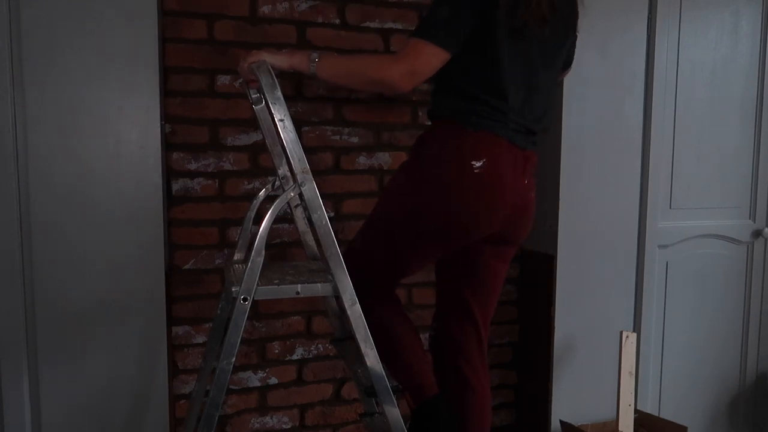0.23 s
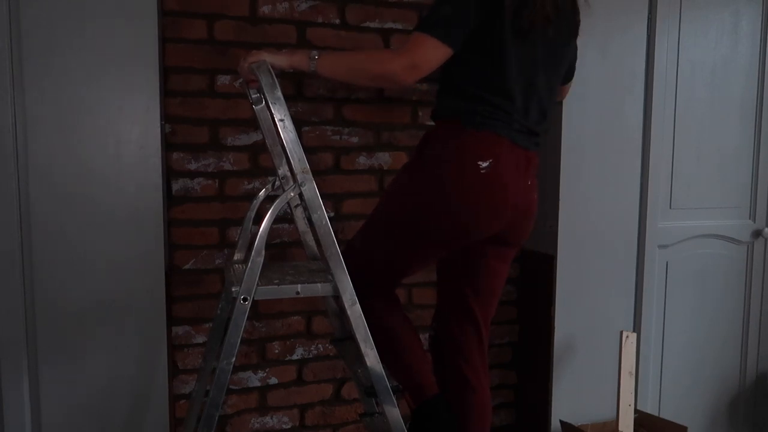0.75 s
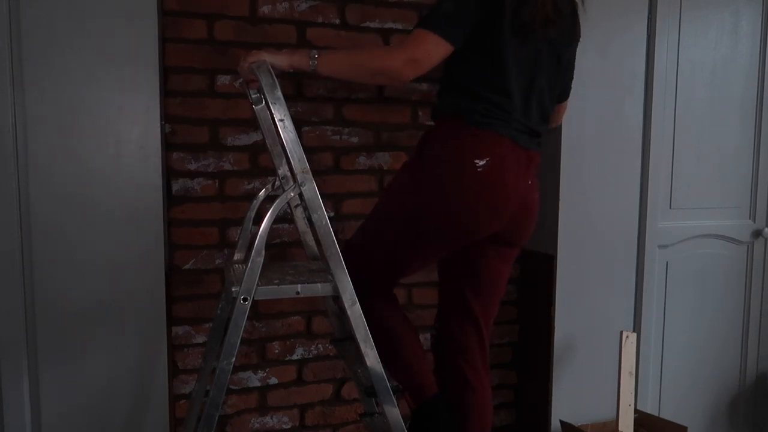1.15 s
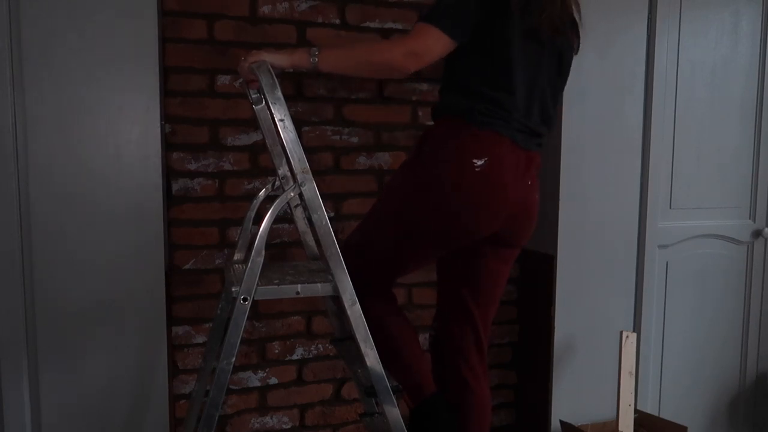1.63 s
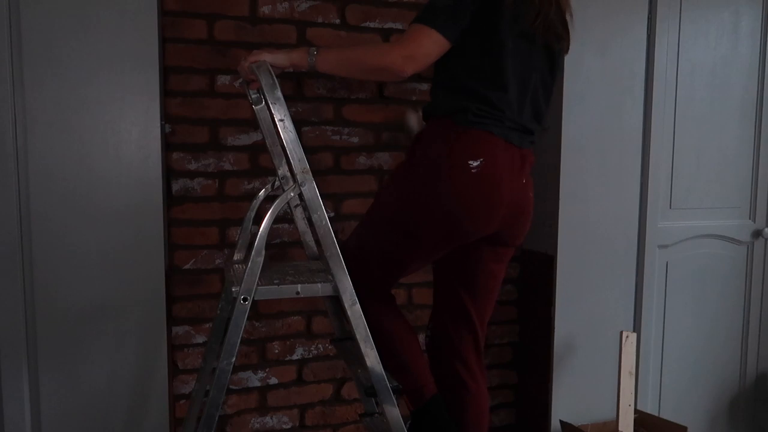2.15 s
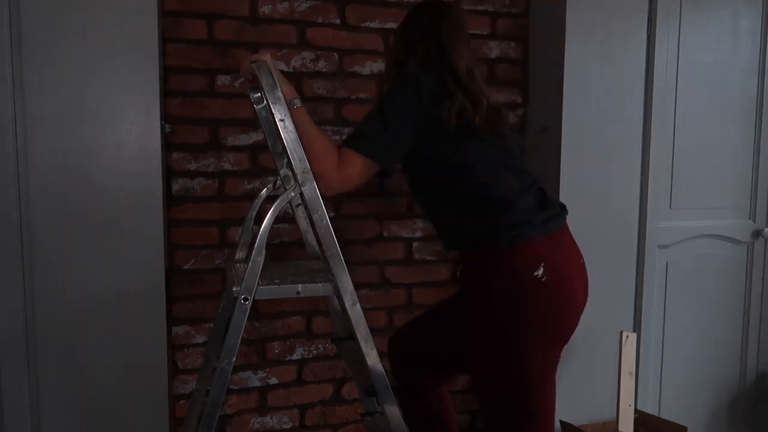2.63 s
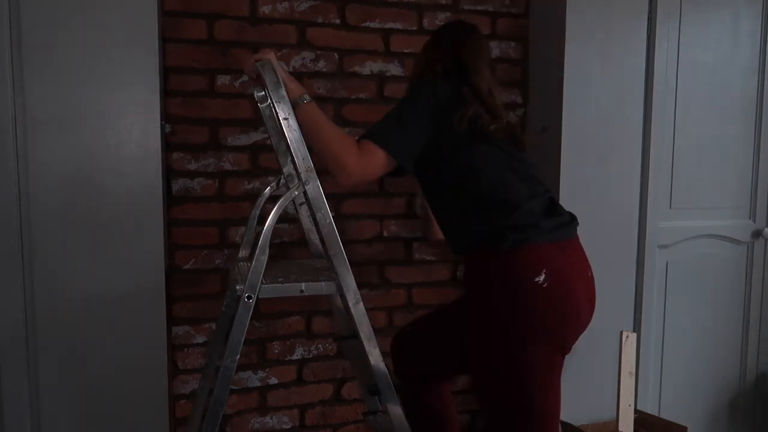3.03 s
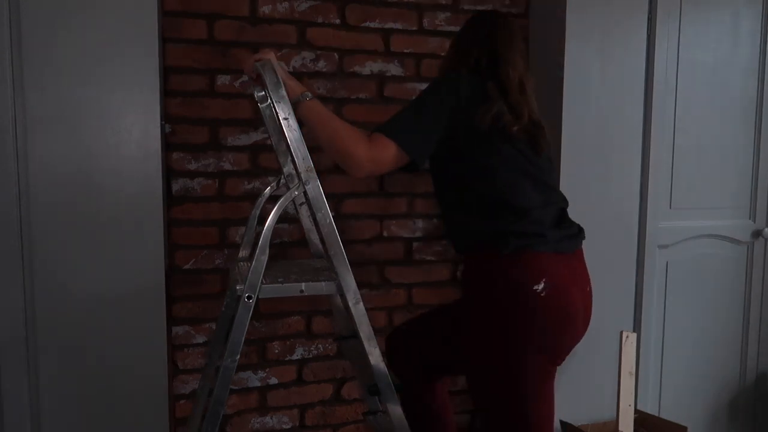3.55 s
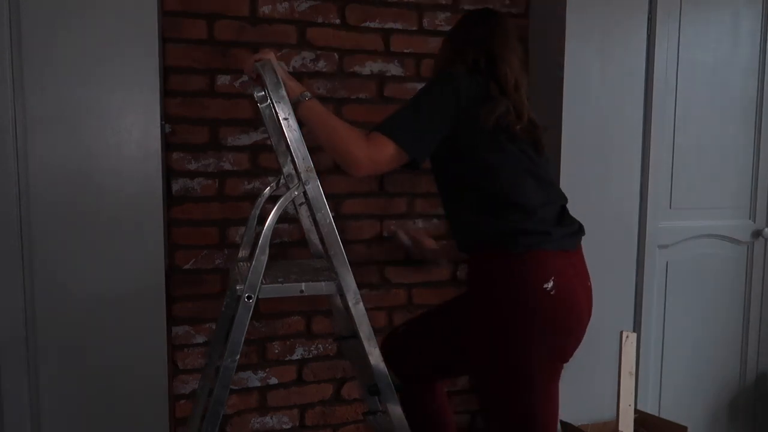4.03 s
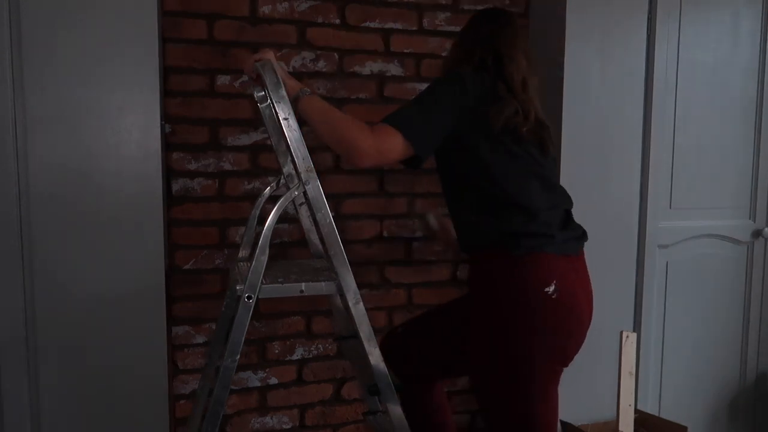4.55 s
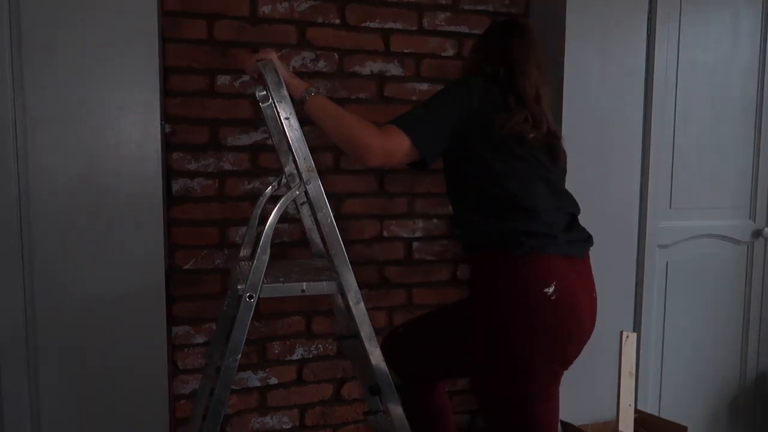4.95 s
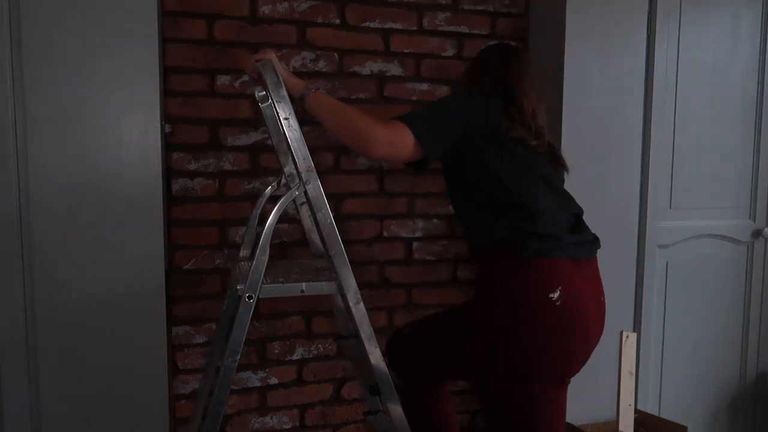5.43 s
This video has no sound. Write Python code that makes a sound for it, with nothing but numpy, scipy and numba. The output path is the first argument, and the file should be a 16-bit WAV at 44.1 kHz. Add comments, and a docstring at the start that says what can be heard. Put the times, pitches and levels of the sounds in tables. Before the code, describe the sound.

Dry bristles rasp over rough brick about twice a second, then falter, with ladder knocks and one hard final stroke.

```python
"""Mains hum, low rumble and room air lie under the whole take in a bare room, a few metres from the camera.
From the first moment a stiff brush sweeps a brick wall: bristle tips skip over rough clay as dense ticks that
ring the brush, and its block taps the wall as it lands. Near 2.9 s weight shifts knock the stepladder in a
cluster; a far engine, two noise bands that rise in pitch, revs at 3.1 s and 4.3 s. The last stroke, at 5.6 s,
lands hardest, with bright taps and the strongest ladder knock."""
import sys
import numpy as np
from scipy import signal
from scipy.fft import rfft, irfft, next_fast_len
from scipy.io import wavfile
from scipy.ndimage import uniform_filter1d
from numba import njit

SR = 44100
rng = np.random.default_rng(int(sys.argv[2]) if len(sys.argv) > 2 else 0)


def log_audio(samples):
    """Write samples as a 16-bit WAV file to the path given in sys.argv[1]."""
    # one column per channel
    frames = np.atleast_2d(samples).T
    # limit to full scale, then quantise
    limited = np.clip(frames, -1, 1)
    pcm = np.round(limited * 32767).astype(np.int16)
    wavfile.write(sys.argv[1], SR, pcm)


N = 250929


def undb(db):
    """Gain of a level in dB."""
    return 10 ** (np.asarray(db) / 20)


def level(x, db):
    """Scale to an rms level."""
    return x * undb(db) / np.sqrt(np.mean(x ** 2))


def curves(table):
    """Columns of a table, interpolated sample by sample over its first column, t/s."""
    s, *columns = np.transpose(table)
    return [np.interp(np.arange(N) / SR, s, c) for c in columns]


def colour(x, points):
    """Shape a spectrum by (f/Hz, gain/dB) points joined over log frequency."""
    size = next_fast_len(N)
    hz, db = np.transpose(points)
    f = np.maximum(np.arange(size // 2 + 1) * SR / size, 1)
    gain = undb(np.interp(np.log(f), np.log(hz), db))
    return irfft(rfft(x, size) * gain, size)[..., :N]


@njit
def svf(x, hz, width):
    """State-variable band-pass with a moving centre, gain 1 there."""
    y, band, low = np.empty(len(x)), 0., 0.
    for i in range(len(x)):
        g, k = np.tan(np.pi * hz[i] / SR), width / hz[i]
        v = (band + g * (x[i] - low)) / (1 + g * (g + k))
        band, low, y[i] = 2 * v - band, low + 2 * g * v, k * v
    return y


def resonance(x, hz, width):
    """Band-pass at a steady centre."""
    return svf(x, np.full(len(x), 1. * hz), 1. * width)


def walk(rate):
    """Random levels held 1 / rate s and slewed twice; spread near 1."""
    k = int(SR / rate)
    steps = np.repeat(rng.standard_normal(N // k + 1), k)
    return 0.626 * uniform_filter1d(uniform_filter1d(steps, k), k)[:N]


def add(out, s, x):
    """Mix a sound in at a time."""
    i = int(s * SR)
    out[i:i + len(x)] += x[:N - i]


# mains hum as narrow noise bands: f/Hz, width/Hz, level/dB
HUM_LINES = [(52, 3.2, -64.5), (99.8, 5.9, -59.5), (150.7, 3.9, -64.5), (196, 7.9, -66.5), (278, 48, -67)]
# swell and fade of the deepest hum, before its waver: t/s, level/dB
DEEP_HUM_SWELL = [(0.0, -64), (0.3, -60), (1.4, -53.5), (2.36, -59), (2.72, -62), (3.9, -69), (4.3, -59),
                  (5.0, -65), (5.25, -58), (5.69, -61)]
# spectrum of the air in the room: f/Hz, relative level/dB
ROOM_AIR = [(15, -40), (25, 3), (107, -26), (126, -6), (188, -2), (227, -8.5), (289, -4.5), (482, -9.5),
            (722, -13), (804, -15.5), (1080, -12), (11500, -32.5), (15500, -79)]
AIR_DB = -56.5  # before its slow waver


def background():
    """Hum, a wandering deep tone and room air as filtered noise; returns middle and left-right parts."""
    lines = [level(resonance(rng.standard_normal(N), hz, width), db) for hz, width, db in HUM_LINES]
    deep_phase = 2 * np.pi * np.cumsum(33. + 3.0 * walk(3.99)) / SR
    deep = level(np.sin(deep_phase), 0) * undb(curves(DEEP_HUM_SWELL)[0] + 1.1 * walk(5.3))
    air = level(colour(rng.standard_normal(N), ROOM_AIR), AIR_DB) * undb(2 * walk(2.62))
    # left-right air: f/Hz, relative level/dB
    wide = [(25, -47), (150, 3.5), (500, 3.5), (3000, -9.0), (8000, -16.5), (14000, -26)]
    return sum(lines) + deep + air, level(colour(rng.standard_normal(N), wide), -55)


# one row a rev of the far engine: start t/s, length t/s, base f/Hz at start and at end,
# 2nd and 3rd order level/dB at the start of the climb
ENGINE_REVS = [(3.07, 0.41, 69.5, 94.4, -57.5, -78), (4.298, 0.67, 69.5, 103.7, -54.5, -66)]
REV_FADE_S, REV_BLUR_HZ = 0.039, 8.
REV_SINK_DB, REV_TILT_DB = 5, 12  # over the climb the 2nd order sinks and the 3rd rises


def engine():
    """A far engine revs twice: noise bands follow the 2nd and 3rd multiples of a climbing pitch."""
    out, t = 0, np.arange(N) / SR
    for s, length_s, from_hz, to_hz, second_db, third_db in ENGINE_REVS:
        climb = np.sin(np.pi / 2 * np.clip((t - s) / length_s, 0, 1)) ** 1.4
        hz = from_hz + (to_hz - from_hz) * climb
        heard = np.clip(np.minimum(t - s, s + length_s - t) / REV_FADE_S, 0, 1)
        second = second_db - REV_SINK_DB * climb ** 4
        third = third_db + REV_TILT_DB * climb ** 2
        for order, db in ((2, second), (3, third)):
            band = svf(rng.standard_normal(N), order * hz, REV_BLUR_HZ)
            out = out + heard * undb(db) * level(band, 0)
    return out


ROOM_T60_S, ROOM_DB = 0.65, -20


def room(x):
    """The bare room's diffuse noise tails, one for the middle and one 28 dB weaker for left-right."""
    t = np.arange(SR) / SR
    tail = rng.standard_normal((2, SR)) * np.exp(-np.log(1000) * t / ROOM_T60_S) * (t > .012)
    tail = tail / np.sqrt(np.sum(tail ** 2, axis=1, keepdims=True)) * undb([[ROOM_DB], [ROOM_DB - 28]])
    return signal.fftconvolve(x[None], tail, axes=1)[:, :N]


# weight shifts on the ladder: t/s, blow level/dB, added level/dB of brace, step and rail modes
WEIGHT_SHIFTS = [(0.536, -35, -15, -34, -6), (1.011, -39, -17, -40, -30), (2.082, -38.5, -3, 6.5, -7),
                 (2.877, -27.5, -7, -3.5, -11), (2.888, -33, -8, 6.5, 2), (2.903, -32.5, -4, 5.5, 3),
                 (2.923, -25, -2, 0, -4), (2.942, -33, 5, 6.5, 0), (2.968, -22.5, -3, -7, -8.5),
                 (2.987, -38, -5, 2, 1), (3.057, -31.5, -8, -8, -21), (3.328, -37.5, -7, -30, -30),
                 (4.019, -36, 6, -7.5, -29), (4.362, -36.5, 4.5, -18, -12), (4.925, -37, 6.5, 2, -12),
                 (4.98, -32, -14, -9, -17), (5.136, -34, 6, -8, -27), (5.163, -27.5, -5.5, -9, -24),
                 (5.192, -25, -2, -11.5, -22), (5.225, -27.5, -9, -23, -24), (5.609, -23.5, 3, -4, -1.5),
                 (5.621, -12, -2, -10.5, -7), (5.633, -20.5, 3, -6, -4), (5.644, -21, 7.5, -11, -10)]
# modes of the ladder frame: nominal f/Hz, level/dB under the blow, t60/s
LADDER_MODES = [(112.1, -21.5, 0.43), (130, -9, 0.21), (161, -11.5, 0.15), (179.8, -18, 0.3),
                (211, -10, 0.068), (260, -10.5, 0.088), (329, -0.5, 0.045), (374.6, -5, 0.17),
                (516, -9.5, 0.076), (448.4, -1.5, 0.09), (701, -8.5, 0.14), (800, -12, 0.057),
                (975, -9, 0.15), (1060, -17, 0.043), (1484, -8, 0.063), (1695, -6, 0.083),
                (1993, -6, 0.075)]
PUSH_S, PUSH_DB = 0.00085, -6.5  # the short shove at the start of a knock
BLOW_S = .004  # a soft blow: time in which the ring builds up
LOOSE = .006  # blur of a ladder mode as a share of its pitch


def ladder():
    """Soft blows ring the frame; each blow shares itself out differently and loose joints blur every mode."""
    out, t = np.zeros(N), np.arange(12000) / SR
    u = t[:int(6 * PUSH_S * SR)] / PUSH_S - 3
    shove = (u ** 2 - 1) * np.exp(-u ** 2 / 2)
    chance = rng.standard_normal((len(WEIGHT_SHIFTS), len(LADDER_MODES), 3))
    for (s, db, brace_db, step_db, rail_db), c in zip(WEIGHT_SHIFTS, chance):
        add(out, s, undb(db + PUSH_DB) * shove)
        for (hz, mode_db, t60), (detune, uneven, phase) in zip(LADDER_MODES, c):
            slip = np.cumsum(rng.standard_normal(len(t))) * np.sqrt(2 * np.pi * LOOSE * hz / SR)
            tone = np.sin(2 * np.pi * hz * (1 + 0.015 * detune) * t + phase + slip)
            ring = tone * np.exp(-np.log(1000) * t / t60) * (1 - np.exp(-t / BLOW_S))
            part_db = 0 if hz < 145 else brace_db if hz < 300 else step_db if hz < 580 else rail_db
            add(out, s, undb(db + mode_db + 0.5 * uneven + part_db) * ring)
    return out * undb(0.5 * walk(40))  # loose joints chatter


# a tuft holds one note for a while: t/s, length t/s, f/Hz, upward arch f/Hz, width/Hz, level/dB before the swell
TUFT_NOTES = [(0.098, 0.048, 3800, 50, 150, -41.5), (0.176, 0.057, 1780, 20, 90, -33),
              (0.205, 0.051, 3870, 50, 150, -37), (0.54, 0.08, 3560, 30, 151, -42),
              (1.005, 0.05, 5900, 30, 200, -47), (1.03, 0.15, 4000, 40, 120, -40.5),
              (1.135, 0.058, 3120, 50, 250, -36), (1.54, 0.03, 1830, 20, 200, -36),
              (1.563, 0.034, 3960, 50, 200, -38), (1.1, 0.066, 2250, 55, 160, -41.5),
              (2.159, 0.13, 3630, 200, 200, -40), (2.39, 0.075, 4100, 20, 90, -63),
              (2.4, 0.06, 3480, 20, 90, -61), (2.892, 0.076, 1610, 24, 100, -40),
              (3.05, 0.17, 4030, 110, 160, -50), (3.241, 0.12, 3930, 45, 140, -53),
              (3.357, 0.22, 2480, 160, 190, -60), (3.42, 0.11, 2050, 30, 120, -67),
              (3.663, 0.11, 3930, 30, 160, -45), (3.671, 0.066, 2480, 50, 160, -48),
              (4.06, 0.1, 2360, 50, 160, -44), (4.42, 0.055, 3800, 100, 160, -44),
              (4.365, 0.033, 1790, 20, 100, -39), (4.412, 0.054, 2580, 20, 100, -44),
              (5.002, 0.045, 2470, 20, 120, -43), (4.99, 0.065, 3900, 50, 150, -48)]
WAVER = .016  # share by which a held note strays


def sings():
    """Narrow, wavering notes of single tufts that swell, arch up in pitch and fade."""
    out, stray = np.zeros(N), 1 + WAVER * walk(60)
    for s, length_s, hz, arch_hz, width, db in TUFT_NOTES:
        arch = np.sin(np.pi * np.linspace(0, 1, int(length_s * SR)))
        pitch = (hz + arch_hz * arch) * stray[int(s * SR):][:len(arch)]
        note = svf(rng.standard_normal(SR // 2)[:len(arch)], pitch, 1. * width)
        add(out, s, level(note, db) * np.sqrt(np.abs(arch)))
    return out


# the brush block lands: t/s, nominal peak level/dB, ring f/Hz, fade t/s, crack level/dB relative to the ring
BLOCK_LANDINGS = [(0.062, -27, 1590, 0.0068, -2), (0.062, -36, 5600, 0.005, -9),
                  (0.077, -23.5, 1890, 0.0059, -2), (0.075, -25, 758, 0.0075, -12),
                  (0.513, -31, 1610, 0.016, -8), (0.514, -37, 5200, 0.008, -7),
                  (0.531, -28, 1770, 0.021, -3), (0.533, -23, 1810, 0.0033, 2),
                  (0.974, -39, 2730, 0.015, -22), (0.977, -44, 1310, 0.012, -20),
                  (1.007, -30.5, 797, 0.017, -20), (1.01, -24, 1650, 0.021, -28),
                  (1.014, -29, 2010, 0.014, -22), (1.465, -43, 2450, 0.014, -14),
                  (1.475, -39, 3610, 0.0086, -3), (1.48, -38, 1670, 0.01, -16),
                  (1.507, -45, 1800, 0.012, -16), (2.07, -35, 2710, 0.013, -10),
                  (2.082, -28, 643, 0.013, -11), (2.078, -32.5, 1210, 0.015, -3),
                  (2.469, -29, 1990, 0.011, 2), (2.883, -23, 1777, 0.012, -8),
                  (3.603, -29, 1816, 0.015, -30), (3.619, -30.5, 1530, 0.023, -23),
                  (4.017, -31, 2410, 0.017, -3), (4.363, -29, 2530, 0.0071, -13),
                  (4.369, -29.5, 997, 0.013, -19), (5.616, -15, 3280, 0.012, -16),
                  (5.62, -26, 2730, 0.012, -11), (5.624, -23.5, 3600, 0.012, -5),
                  (5.627, -34, 940, 0.02, -14), (5.622, -23, 2010, 0.015, -14),
                  (5.632, -24, 1506, 0.011, -11)]
SOLID = 0.61  # share of a clean ring in each tap
CRACK_HZ, CRACK_WIDTH_HZ = 3600, 770


def taps():
    """The block taps the wall: a short bright noise crack with a wooden ring, part tone and part noise."""
    out, t = np.zeros(N), np.arange(4000) / SR
    for s, db, hz, fade_s, crack_db in BLOCK_LANDINGS:
        blow = rng.standard_normal(len(t))
        rough = level(resonance(blow, hz, 0.22 * hz), 0)
        ring = (1 - SOLID) * rough + SOLID * np.sqrt(2) * np.sin(2 * np.pi * hz * t)
        crack = level(resonance(blow, CRACK_HZ, CRACK_WIDTH_HZ), crack_db)
        tap = (ring + crack) * np.exp(-t / fade_s) * (1 - np.exp(-t / 0.00095))
        add(out, s, undb(db) * tap / (3 * np.std(tap[:400])))  # peak taken as 3 times the early spread
    return out


GRIT_PER_S, GRIT_DB = 220, -13  # level before the stroke's pressure


def grit():
    """Crumbs of mortar crack loose: sparse dry cracks of uneven size and changing dull pitch."""
    size = rng.standard_normal(N) * undb(3 * rng.exponential(size=N))
    x = (rng.random(N) < GRIT_PER_S / SR) * size
    return level(svf(x, 2600 * undb(7.8 * walk(200)), 1200.0), GRIT_DB)


def ticks(per_s, scatter_db):
    """Tips let go at random, a few much harder; near surfaces smear each tick without tinting it."""
    x = (rng.random(N) < per_s / SR) * rng.standard_normal(N) * undb(scatter_db * rng.exponential(size=N))
    for lag in (37, 113, 211):  # all-pass loops, lag in samples
        loop = np.zeros(lag + 1)
        loop[[0, -1]] = 1, -.55
        x = signal.lfilter(loop[::-1], loop, x)
    return x


TUFT_COUNT, TUFT_WIDTH_HZ, TUFT_GAIN = 12, 77, 2.02
TUFT_LOW_HZ, TUFT_HIGH_HZ = 802, 6520
TUFT_HOLD_S = 0.022  # mean time between catches
TUFT_SCATTER_DB = 18  # spread of bite from the hardest catch to the lightest


def tufts(x):
    """Tufts of bristles sing for a moment, each at a pitch that changes whenever it catches anew."""
    out = 0
    for _ in range(TUFT_COUNT):
        chance = rng.random((400, 3))
        catch_s = np.cumsum(TUFT_HOLD_S * (.5 + chance[:, 0]))
        catch = np.searchsorted(catch_s, np.arange(N) / SR).clip(0, 399)
        hz = TUFT_LOW_HZ * (TUFT_HIGH_HZ / TUFT_LOW_HZ) ** chance[catch, 1]
        bite = uniform_filter1d(undb(-TUFT_SCATTER_DB * chance[catch, 2]), size=130)
        out = out + bite * svf(x, hz, TUFT_WIDTH_HZ)
    return TUFT_GAIN * out


# one row a stroke or part of a stroke: touch t/s, rise t/s, hold t/s,
# drive level/dB at touch, at full press and at lift,
# wall rumble level/dB, tip hiss level/dB, wall resonance f/Hz, level/dB of the three brush modes;
# rumble, hiss and modes are relative to the drive, before landing and lifting change them
BRUSH_STROKES = [ (0.045, 0.12, 0.1, -46.5, -33.5, -36.5, -6.5, -1, 855, -12, -42, -18),
                 (0.524, 0.087, 0.11, -37.5, -32.5, -35.5, -8.5, -2.5, 780, -13.5, -36, -27),
                 (0.972, 0.08, 0.14, -51, -34.5, -35, -6, -1, 666, -13.5, -47, -21),
                 (1.465, 0.11, 0.14, -55.5, -35.5, -38.5, -4.5, 2, 570, -7, -10.5, -33),
                 (2.071, 0.038, 0.15, -38.5, -35, -34, -11.5, 0.5, 674, -10, -22, -17),
                 (2.4, 0.056, 0.016, -58, -52.5, -47, -13, 9.5, 730, -6, -26, -11),
                 (2.462, 0.0063, 0.0042, -52, -39, -38.5, -12, -9, 700, -18, -29, -9),
                 (2.868, 0.013, 0.18, -47, -42.5, -39, -6.5, -2, 428, -12, -29, -29),
                 (3.005, 0.08, 0.11, -57, -32.5, -36.5, -10, -3.5, 725, -9.5, -16, -8.5),
                 (3.22, 0.031, 0.067, -37, -44.5, -47.5, -12.5, 1.5, 820, -9, -19, -7),
                 (3.38, 0.033, 0.23, -62, -59, -68, -26, -25, 480, -19, -14, -16),
                 (3.6, 0.083, 0.053, -39.5, -38.5, -38.5, -7, 2.5, 580, -22, -11, -30),
                 (4.017, 0.067, 0.042, -44, -35.5, -38, -12, 1.5, 706, -15, -15, -12),
                 (4.361, 0.07, 0.044, -47, -37.5, -38.5, -9, 3, 760, -15, -17, -12),
                 (4.846, 0.024, 0.053, -63, -48.5, -57, -6, 0, 900, -14, -10, -7),
                 (4.9, 0.11, 0.12, -48, -38, -40, -3, 3.5, 565, -9.5, -12, -20),
                 (5.165, 0.016, 0.022, -52, -49.5, -57, 5, -13, 905, 5, -17, -25),
                 (5.44, 0.057, 0.047, -62, -55.5, -45, -3, 3.5, 520, -7, -13, -17),
                 (5.505, 0.029, 0.067, -61, -44.5, -43, -1, 5, 500, -13, -20, -5),
                 (5.615, 0.011, 0.07, -30, -25.5, -32.5, -8.5, -1, 620, -15, -27, -35), ]
RISE_BEND = 1.33  # the level climbs fast at first, then levels off
BRUSH_IN_S = 0.0036  # the first bristles touch one after another
LEAD_S, LEAD_DB = 0.0072, -13  # stray bristles graze the wall just before the touch
SETTLE_S = 0.038  # the landing colours the start of a row for about this long
LAND_RUMBLE_DB, LAND_TIP_DB, LAND_MODE_DB = 4, -20, (-8.5, 0, 0)  # change of colour at the landing
LIFT_DB_PER_S, LIFT_KNEE_S = 214, 0.031  # final slope of the fade on lifting; it sets in gently
LIFT_S = 0.1  # the colour changes over this time as the brush lifts
LIFT_RUMBLE_DB, LIFT_TIP_DB, LIFT_MODE_DB = -14, -11, (-7, -5, -7)  # change of colour once lifted
LIFT_WALL_SAG = 0.18  # share by which the wall resonance falls on lifting
RUMBLE_PER_PRESS = 0.083  # a light touch wakes the wall less: dB of rumble per dB of rise


def strokes():
    """Press, rumble, hiss and mode gains, and the wall resonance; one rule shapes every row."""
    t = np.arange(N) / SR
    power, wall_hz = np.full((6, N), 1e-12), np.full(N, 1. * BRUSH_STROKES[0][8])
    land = np.array([0, LAND_RUMBLE_DB, LAND_TIP_DB, *LAND_MODE_DB])[:, None]
    lift = np.array([0, LIFT_RUMBLE_DB, LIFT_TIP_DB, *LIFT_MODE_DB])[:, None]
    for (s, rise_s, hold_s, touch_db, full_db, lift_db,
         rumble_db, tip_db, hz, *mode_db) in BRUSH_STROKES:
        i = int(s * SR)
        age = t[:min(SR // 2 + int((rise_s + hold_s) * SR), N - i)]
        after = np.maximum(age - rise_s - hold_s, 0)
        light_db = (touch_db - full_db) * np.maximum(1 - age / rise_s, 0) ** RISE_BEND
        hold_db = (lift_db - full_db) * np.clip((age - rise_s) / hold_s, 0, 1)
        fade_db = LIFT_DB_PER_S * after ** 2 / (after + LIFT_KNEE_S)
        db = full_db + light_db + hold_db - fade_db
        landing, lifted = np.exp(-age / SETTLE_S), np.minimum(after / LIFT_S, 1)
        own = np.array([0, rumble_db, tip_db, *mode_db])[:, None]
        shares = own + land * landing + lift * lifted
        shares[1] += RUMBLE_PER_PRESS * light_db
        touch = np.clip(age / BRUSH_IN_S, undb(LEAD_DB), 1)
        power[:, i:i + len(age)] += undb(db + shares) ** 2 * touch ** 2
        lead = t[:min(i, 4000)][::-1]  # time left until the touch
        power[:, i - len(lead):i] += undb(touch_db + LEAD_DB + own) ** 2 * np.exp(-2 * lead / LEAD_S)
        wall_hz[i:] = hz * (1 - LIFT_WALL_SAG)
        wall_hz[i:i + len(age)] = hz * (1 - LIFT_WALL_SAG * lifted)
    return np.sqrt(power), wall_hz


# colour of the scrape, middle part: f/Hz, gain/dB
SCRAPE_COLOUR = [(88, -51), (150, -13), (263, -12.5), (359, -5.5), (618, -8), (1090, -7), (1510, 1),
                 (1800, 2), (2020, 7.5), (3910, 1.5), (4390, -4), (12300, -23.5), (15500, -102)]
# colour of the scrape, left-right part: f/Hz, gain/dB before the whole is levelled
SIDE_COLOUR = [(1470, -85), (2500, -68), (2740, -43), (2890, -31), (3270, -26), (3450, 2.5), (3900, 4),
               (8700, 3.5), (11400, 6), (13400, 4.5), (15600, -18)]
# modes of block and bristles: nominal f/Hz, width/Hz
BRUSH_MODES = [(1780, 90), (2540, 280), (3930, 120)]
BROAD_DB, ACROSS_DB = -6.5, 1.5  # mid band and left-right part, before the stroke's pressure
RUMBLE_FLICKER_DB = 2
BEND = .012  # share by which a brush mode strays


def split(x, hz, kind):
    """Keep the low or high end of a sound without delay."""
    return signal.sosfiltfilt(signal.butter(2, hz, kind, fs=SR, output="sos"), x)


def brush():
    """Tip ticks ring wall, tufts and brush under the strokes' gains; returns middle and left-right parts."""
    (press, rumble, tip, *modes), wall_hz = strokes()
    grip = undb(1.03 * walk(70))  # bricks and joints grip unevenly
    tips = ticks(12000, 1.84)
    scrape = colour(tips + 1.6 * svf(tips, wall_hz, 280.0) + tufts(tips), SCRAPE_COLOUR)
    low, high = split(scrape, 1250, "low"), split(scrape, 5250, "high")
    mid = level(scrape - low - high, BROAD_DB) * press * undb(2 * walk(120))
    mid = mid + level(low, 0) * rumble * undb(RUMBLE_FLICKER_DB * walk(25.47))
    mid = mid + level(high, 0) * tip * undb(1.6 * walk(150))
    for (hz, width), share in zip(BRUSH_MODES, modes):
        bent = hz * (1 + BEND * walk(25))  # bending the bristles shifts each mode
        mid = mid + level(svf(tips, bent, 1. * width), 0) * share * undb(0.64 * walk(30.1))
    mid = mid + grit() * press
    # the left-right part is a separate run of ticks, mostly treble
    side = level(colour(ticks(12000, 0.53), SIDE_COLOUR), ACROSS_DB) * press * (tip / press) ** 0.71
    return mid * grip, side * grip


def scene():
    """All sources lie straight ahead; the brush's left-right part is separate noise, mostly treble."""
    mid, side = brush()
    mid = mid + taps() + ladder() + sings()
    wet_mid, wet_side = room(mid)
    air_mid, air_side = background()
    mid = mid + wet_mid + air_mid + engine()
    side = side + wet_side + air_side
    return np.array([mid + side, mid - side])


TOP_HZ = 15550


def record(dry):
    """The camera's microphone channel cuts the top with a steep low-pass."""
    return signal.sosfilt(signal.ellip(10, .2, 80, TOP_HZ, fs=SR, output="sos"), dry)


dry = scene()
out = record(dry)
log_audio(out)
```